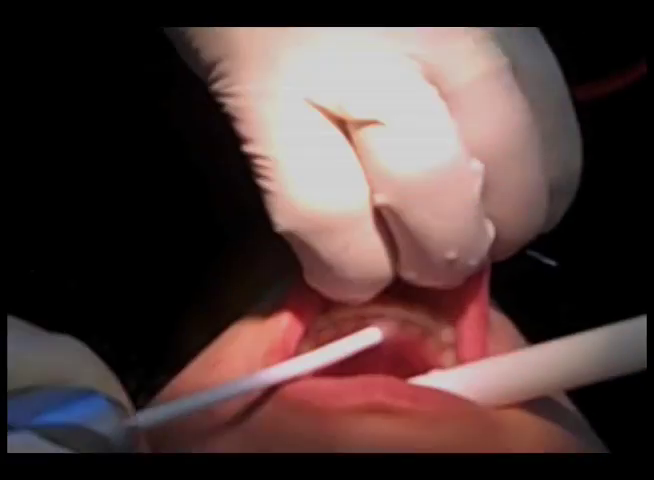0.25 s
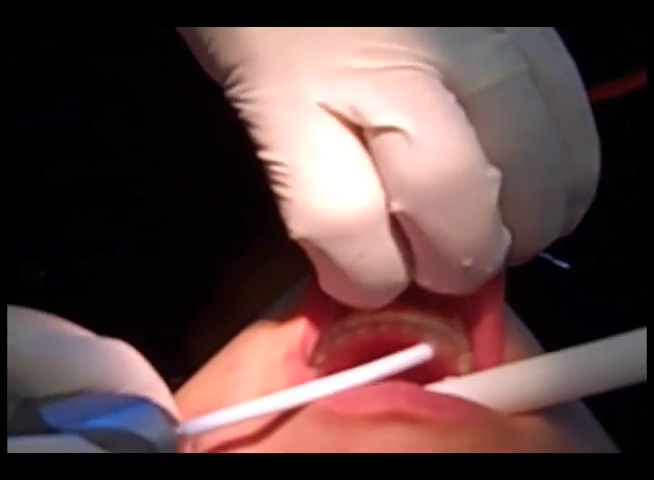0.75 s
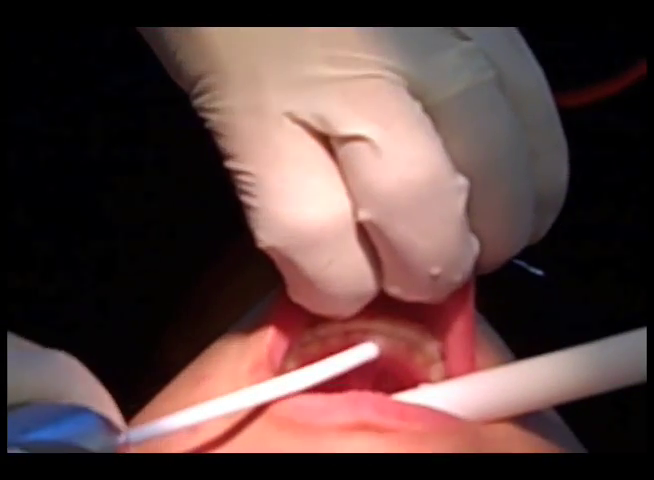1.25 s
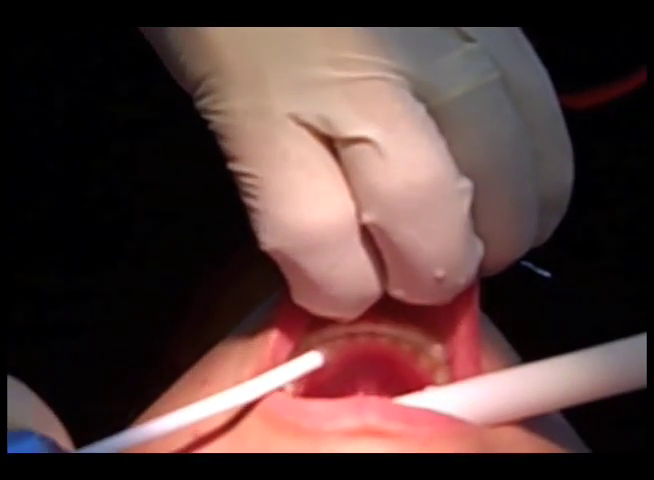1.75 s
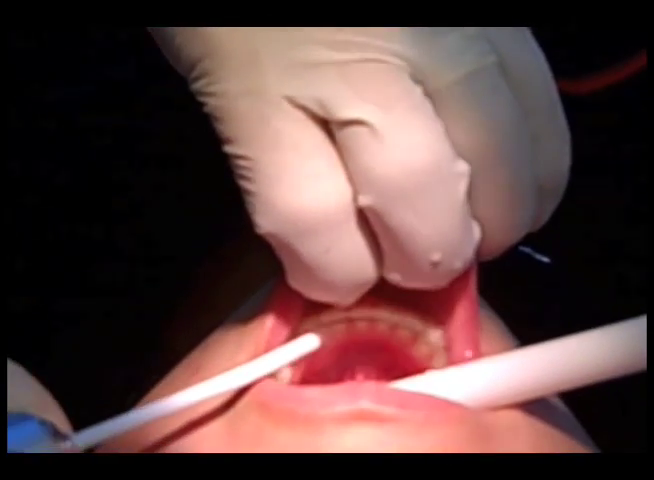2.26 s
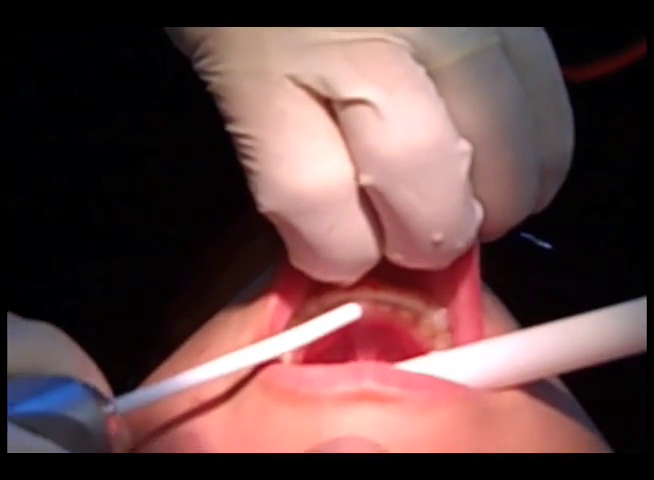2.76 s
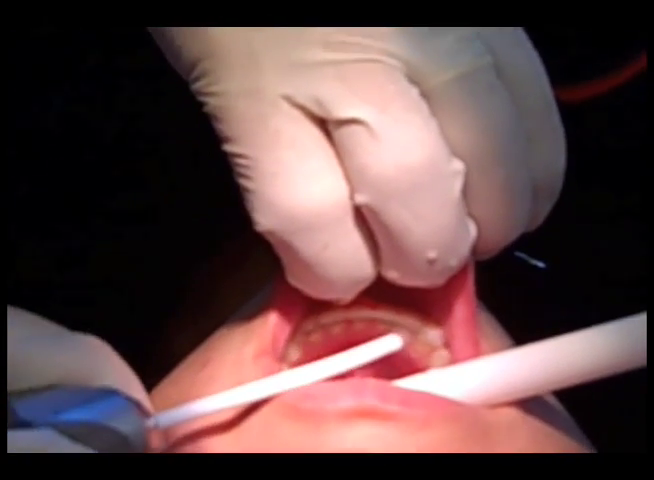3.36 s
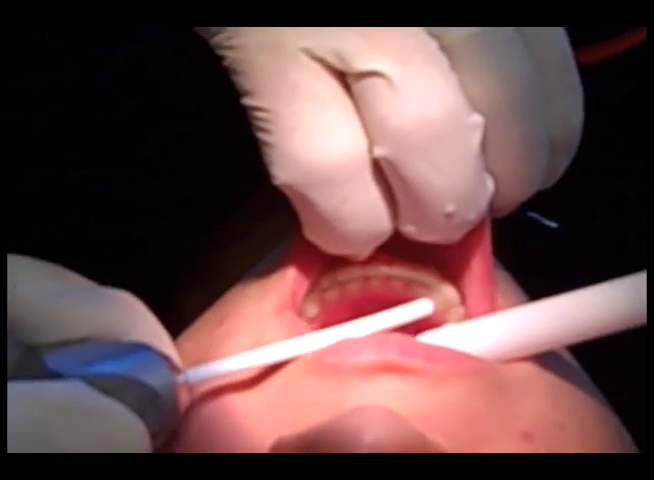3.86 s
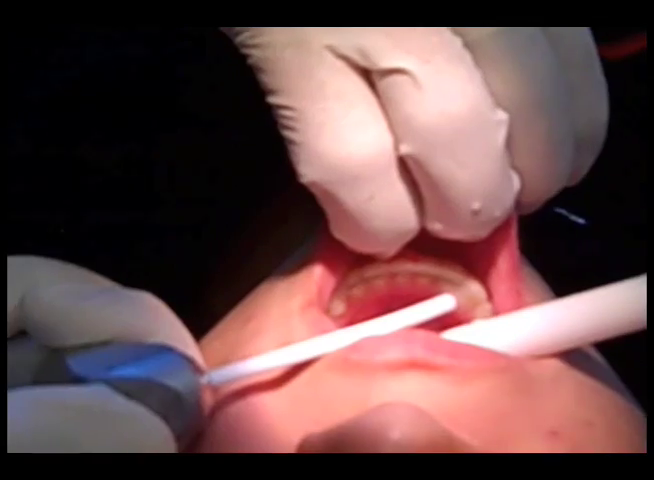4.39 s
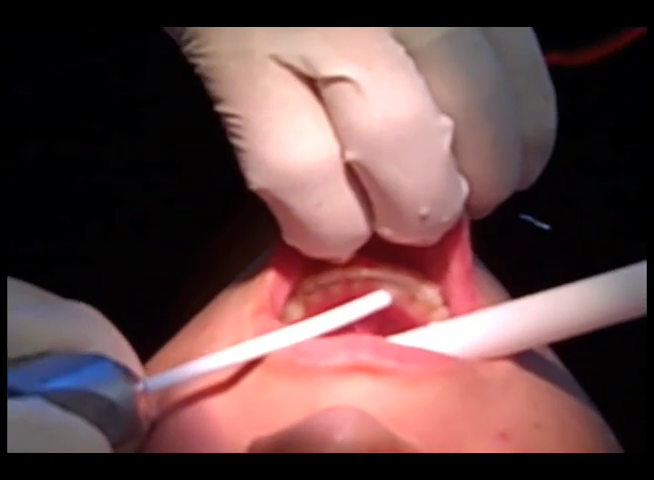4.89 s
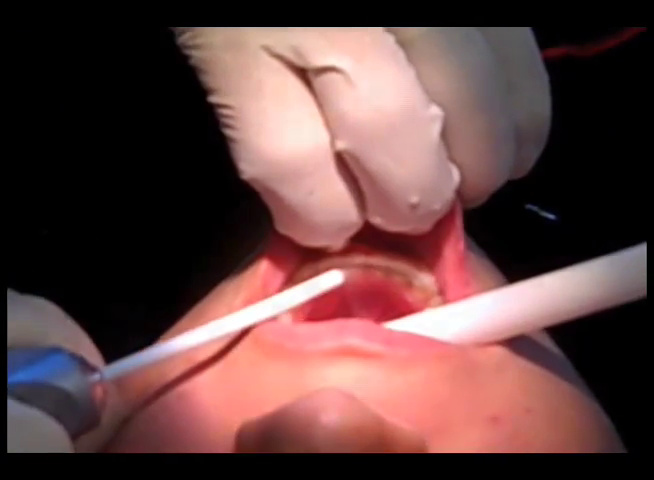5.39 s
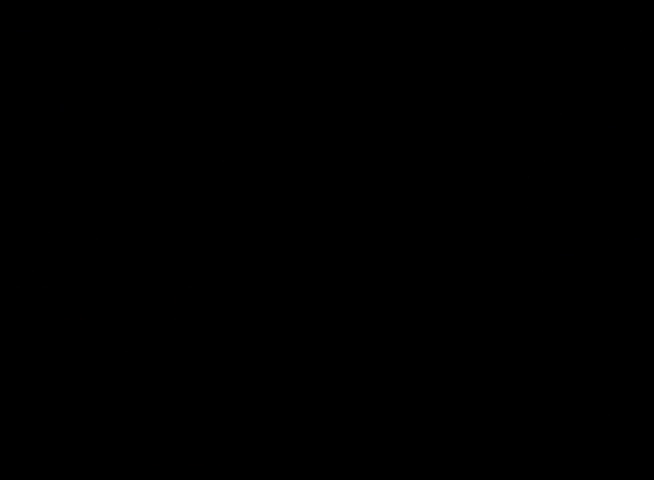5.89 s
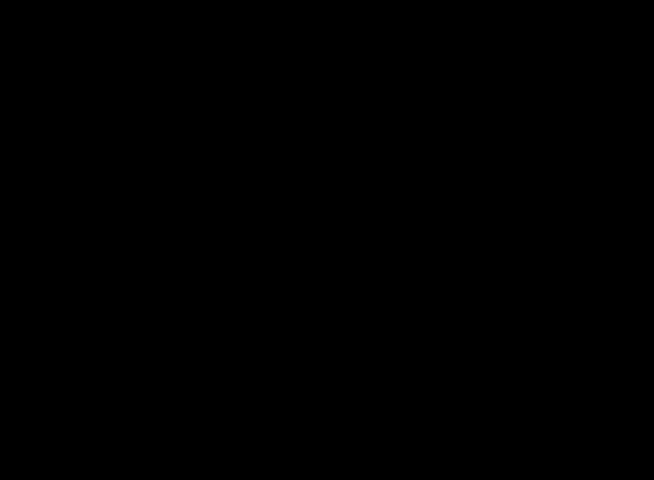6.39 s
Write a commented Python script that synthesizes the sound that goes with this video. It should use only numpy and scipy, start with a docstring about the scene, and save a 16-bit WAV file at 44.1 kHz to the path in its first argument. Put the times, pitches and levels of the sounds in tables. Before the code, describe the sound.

A steady, bright, wet hiss starts at once in a small clinic, close-miked in stereo, its highest fizz leaning left. Brief airy whistles flicker as the jet crosses gaps between teeth, and the mouth cavity adds an unsteady breathy note. Beneath are a weak suction rush, electrical hum and a faint climbing motor. Near the end the spray fades smoothly to almost nothing, with dim room noise behind.

```python
"""A dental air-water syringe hisses and sings, close up, as its jet sweeps along the teeth of an open mouth.
One turbulent stream with droplet ticks is filtered into splash, cavity ring, jet hiss and mist.
Below it lie the suction's low rush (shaped noise), a faint hum and a slowly rising motor note (sines).
Puffs of air rumble at the microphone; all this fades out, and quiet room tone fades in."""
import sys
import numpy as np
from scipy import signal
from scipy.fft import rfft, irfft
from scipy.io import wavfile
from scipy.ndimage import uniform_filter1d

SR = 44100
rng = np.random.default_rng(int(sys.argv[2]) if len(sys.argv) > 2 else 0)


def waveform_to_disk(signal):
    """Save audio, clipped to [-1, 1], as 16-bit WAV at the path in sys.argv[1]."""
    frames = np.transpose(np.atleast_2d(signal))
    scaled = np.clip(frames, -1, 1) * 32767
    samples = np.round(scaled).astype(np.int16)
    wavfile.write(sys.argv[1], SR, samples)


N = 292718
T = np.arange(N) / SR
FRAME = 1024
HOP_OVERLAP = FRAME * 3 // 4
HZ = np.fft.rfftfreq(FRAME, 1 / SR)[:, None]

# Where the nozzle points. Each row: time in seconds, aim (0 = front teeth, 1 = into the cheek).
AIM = [(0, 0), (1.4, 0.29), (1.8, .4), (3.1, 0.93), (3.3, 0.99), (4.7, 1), (5.4, 1), (6.4, 0.78)]
# How hard the water splashes in the mouth. Each row: time in seconds, level in dB before the spray's trim.
SPLASH_LEVEL = [(0.0, -30.2), (0.36, -26.4), (1.13, -24.6), (1.21, -26.8), (1.63, -25.5), (1.75, -23.2),
                (2.15, -26.3), (2.2, -24.7), (2.67, -24.4), (3.14, -27.2), (3.25, -22.4), (3.6, -25.2),
                (3.87, -22.0), (4.18, -23.9), (4.55, -23.6), (5.9, -25.2), (6.07, -28.3), (6.21, -24.4)]
USUAL_SPLASH_DB = -24.5
# Room resonances in the low noise. Each row: frequency in Hz, width in Hz, lift in dB.
ROOM_MODES = [(230, 27, 5), (391, 21, 11.5), (478, 33, 3), (569, 26, 15)]


def gain_of(db):
    """Decibels to amplitude."""
    return 10 ** (np.asarray(db) / 20)


def evened(x):
    """Scales to rms 1."""
    return x / np.sqrt(np.mean(x ** 2) + 1e-20)


def along(rows, t):
    """Columns of a time curve, interpolated at the times t."""
    s, *columns = np.transpose(rows)
    return [np.interp(t, s, c) for c in columns]


def across(rows, hz):
    """Columns of a spectrum, interpolated over log frequency."""
    f, *columns = np.transpose(rows)
    log_f = np.log(np.sort(f) + 1)
    return [np.interp(np.log(hz + 1), log_f, c) for c in columns]


def bell(x, centre, width):
    """Smooth hump over frequency or time: 1 at its centre, a half at width / 2 away."""
    return np.exp2(-(2 * (x - centre) / width) ** 2)


def swells(rows, t):
    """Sum of smooth level humps in dB, one per row of middle s, length s, dB."""
    return sum(db * bell(t, s, length) for s, length, db in rows)


def coloured(spectrum, modes=()):
    """Steady noise of rms 1 with the given spectrum, lifted at the given resonances."""
    hz = np.fft.rfftfreq(N, 1 / SR)
    lift_db = sum(lift * bell(hz, centre, width) for centre, width, lift in modes)
    db = across(spectrum, hz)[0] + lift_db
    return evened(irfft(rfft(rng.standard_normal(N)) * gain_of(db), N))


def wobble(rate_hz):
    """Random motion of rms 1, up to about the given rate."""
    hz = np.fft.rfftfreq(N, 1 / SR)
    lowpass = 1 / (1 + (hz / rate_hz) ** 4)
    return evened(irfft(rfft(rng.standard_normal(N)) * lowpass, N))


def in_band(power, band_hz):
    """Scales each frame's power so that white noise through it has rms 1 within the band."""
    inside = (HZ >= band_hz[0]) & (HZ <= band_hz[1])
    return power / np.mean(power * inside, axis=0)


def turbulence(sputter_db, sputter_hz, drops_per_s, drop_spread_db, drop_db):
    """Rushing air sputters as water breaks up in it, with droplet ticks: two unrelated streams."""
    air = rng.standard_normal((2, N))
    sizes = gain_of(drop_spread_db * np.minimum(rng.exponential(1, N), 4))
    struck = rng.random(N) < drops_per_s / SR
    drops = evened(sizes * struck * rng.choice([-1, 1], (2, N)))
    sputter = gain_of(sputter_db * wobble(sputter_hz))
    return evened((air + gain_of(drop_db) * drops) * sputter)


def spray_levels(t, graze_db, aim, unrest_db=.25, unrest_hz=7):
    """Levels in dB of splash, ring, jet and mist: all follow the splash, and a graze turns ring into hiss."""
    # Air blows straight into the cavity (+) or past it (-).
    # Each row: middle in seconds, length in seconds, ring change in dB.
    ring_swells = [(.6, .18, 2.3), (1.3, .16, 2.2), (1.83, .3, 4), (2.45, .45, 1.2), (3.15, .16, -2),
                   (3.58, .12, -2), (4.85, .7, 1.8)]
    # Water atomises on a tooth. Each row: middle in seconds, length in seconds, mist lift in dB.
    mist_bursts = [(.42, .55, 2.2), (1.14, .35, 2.3), (2.08, .18, 4), (2.25, .08, 3.2), (2.7, .25, 1),
                   (4.32, .15, 1.3), (4.72, .2, 1)]
    # base levels, then dB per dB of splash
    ring_base_db, jet_base_db, mist_base_db = -30.3, -20.2, -27.4
    ring_follows, jet_follows, mist_follows = 1.05, .2, .42
    ring_cheek_db = -1.2  # the cavity rings less with the jet in the cheek
    ring_loss = .27  # air caught by a tooth misses the cavity: dB lost per dB of graze

    splash_db, = along(SPLASH_LEVEL, t)
    push_db = splash_db - USUAL_SPLASH_DB
    ring_db = ring_base_db + ring_follows * push_db + swells(ring_swells, t)
    ring_db = ring_db + ring_cheek_db * aim - ring_loss * graze_db
    jet_db = jet_base_db + jet_follows * push_db + graze_db
    mist_db = mist_base_db + mist_follows * push_db + swells(mist_bursts, t)
    unrest = unrest_db * np.interp(t, T, wobble(unrest_hz))
    return np.array([splash_db, ring_db, jet_db, mist_db]) + unrest


def mouth_power(t, patchy_db):
    """The jet excites the mouth's resonances by where it points; shifting water makes them waver."""
    # Higher mouth resonances. Each row: frequency in Hz, width in Hz,
    # lift in dB with the jet at the teeth, lift in dB with it in the cheek.
    resonances = [(2776, 220, 1.5, 5.3), (3780, 260, 5.3, 2), (4040, 330, 1.8, 3.8), (4900, 840, 1.3, 5.4),
                  (5630, 460, 6, 1), (6280, 350, 2.5, 6), (6740, 440, 3, 4), (9230, 760, 3.5, 0),
                  (12200, 1500, -2, .4)]
    aim, = along(AIM, t)
    lift_db = sum(bell(HZ, hz, width) * (teeth + aim * (cheek - teeth))
                  for hz, width, teeth, cheek in resonances)
    patches = rng.standard_normal(lift_db.shape)
    patches = uniform_filter1d(patches, size=14, axis=0)  # over frequency
    patches = evened(uniform_filter1d(patches, size=7, axis=1))  # over time
    return gain_of(lift_db + patchy_db * patches) ** 2


def cavity_ring(t, width_hz=130, skirt=1.46, waver_hz=10):
    """Power of the mouth's lowest resonance, a breathy whistle of unsteady pitch."""
    # Lowest resonance of the open mouth. Each row: time in seconds, frequency in Hz.
    cavity = [(0.0, 1158), (2.01, 1190), (2.26, 1190), (3.92, 1180), (4.76, 1255), (5.04, 1223),
              (6.4, 1276)]
    ring_hz = along(cavity, t)[0] + waver_hz * np.interp(t, T, wobble(25))
    return (1 + (2 * (HZ - ring_hz) / width_hz) ** 2) ** -skirt


def edge_tone(t, graze_db, aim, width_hz=440, waver_hz=80):
    """Power lift of an unsteady edge tone in the jet, which sinks as the jet bears on a tooth."""
    free_hz, sag_hz_per_db = 7660, 90
    teeth_db, cheek_db = 5.3, 3.6  # height over the hiss, by aim
    edge_hz = free_hz - sag_hz_per_db * graze_db + waver_hz * np.interp(t, T, wobble(40))
    edge_db = teeth_db + aim * (cheek_db - teeth_db)
    return gain_of(edge_db * bell(HZ, edge_hz, width_hz)) ** 2


def whistle_lift_db(t):
    """Brief breathy whistles as the jet crosses gaps between teeth, and one broad low spatter of the splash
    near 1 s: lifts of the spray's noise."""
    # Each row: middle in seconds, length in seconds, frequency in Hz, width in Hz, lift in dB.
    whistles = [(.45, .35, 9300, 600, 3.5), (.48, .25, 2830, 200, 4), (1.1, .25, 9500, 600, 3.5),
                (1.05, .3, 1900, 900, 2.5), (1.38, .22, 6100, 450, 3), (2.12, .14, 10400, 600, 4),
                (2.174, 0.07, 6440, 500, 4), (2.52, .22, 7620, 400, 3), (5.1, .45, 8500, 350, 3.5),
                (5.75, .35, 13500, 800, 5), (6.02, .24, 8880, 700, 9), (6.02, .2, 6450, 450, 3.5)]
    return sum(db * bell(t, s, length) * bell(HZ, hz, width)
               for s, length, hz, width, db in whistles)


def at_ports(z):
    """Two unrelated streams become a port pair: alike in the bass, shaded and turned in the treble."""
    # The two microphone ports. Each row: frequency in Hz, left minus right in dB,
    # likeness (0-1), lead of the left in radians.
    ports = [(850, 0, 1, 0), (1250, -0.2, 0.98, -.1), (1550, 0, 1, 0), (2850, 0, 1, 0),
             (3200, 0, 0.8, -.15), (3600, 0, .95, -.1), (4000, -1, 0.82, -0.42), (5000, -.5, .8, -.36),
             (5570, -.3, 0.68, -0.6), (6000, -2.5, .72, -1.1), (6280, -6.5, .82, -0.95),
             (6720, -3.5, 0.95, -0.76), (7450, 3, 0.88, 0.4), (8100, 10, .85, 0.2), (8700, 11, 0.6, -.2),
             (9500, 11, .74, -1.5), (11500, 8.5, .52, -1.8), (14100, 19.5, .33, -2)]
    tilt_db, same, lead_rad = across(ports, HZ)
    same, tilt = np.clip(same, 0, 1), gain_of(tilt_db / 2)
    left = tilt * z[0]
    right = (same * z[0] + np.sqrt(1 - same ** 2) * z[1]) * np.exp(-1j * lead_rad) / tilt
    # dividing by this keeps the level of the left-right mean
    centre = np.sqrt(tilt ** 2 + tilt ** -2 + 2 * same * np.cos(lead_rad)) / 2
    return np.array([left, right]) / centre


def spray(ring_flutter_db=0.9, trim_db=-.35):
    """One turbulent stream sounds as splash, cavity ring, jet hiss and mist."""
    # Colour of each part. Each row: frequency in Hz, relative density in dB per Hz.
    splash_colour, jet_colour, mist_colour = [(300, -37), (520, -33), (630, -23), (770, -8.3), (950, -8),
                                              (1100, -4), (1450, 1.2), (1750, -1), (2000, 0.2),
                                              (2300, -0.5), (3450, -1.1), (3900, 2), (5800, -2),
                                              (7000, -15), (10000, -31)], [(4500, -42.5), (5700, -14.5), (6100, -4),
                                                              (6600, -1.5), (7200, 1.5), (7800, -0.5),
                                                              (8300, -8.5), (9200, -27.5), (12000, -37.5)], [(6500, -39), (8000, 3.5),
                                                                           (8500, 0), (8850, 1.5),
                                                                           (9500, 0), (10100, -3.5),
                                                                           (10800, -6), (11800, -10.5),
                                                                           (12700, -11), (14200, -11.5)]
    # The jet bears on a tooth (+) or slips off it (-).
    # Each row: middle in seconds, length in seconds, hiss change in dB.
    grazes = [(1.39, .28, 3.4), (2.17, .07, 3.6), (2.33, .25, -1.2), (2.75, .4, 4.4), (3.33, .22, 1.7),
              (3.63, .12, -1.5), (4.2, .25, -.7), (4.85, .45, 1.5), (5.38, .25, 1.2), (5.78, .5, -3.5),
              (6.17, .16, -2.2)]

    stream = turbulence(sputter_db=0.35, sputter_hz=160, drops_per_s=1100, drop_spread_db=3, drop_db=-9)
    _, t, z = signal.stft(stream, SR, nperseg=FRAME, noverlap=HOP_OVERLAP)
    graze_db, aim = swells(grazes, t), along(AIM, t)[0]
    splash_db, ring_db, jet_db, mist_db = spray_levels(t, graze_db, aim)
    ring_db = ring_db + ring_flutter_db * np.interp(t, T, wobble(35))

    mouth = mouth_power(t, patchy_db=1.1)
    splash, jet, mist = (mouth * gain_of(across(colour, HZ)[0]) ** 2
                         for colour in (splash_colour, jet_colour, mist_colour))
    jet = jet * edge_tone(t, graze_db, aim)
    # each level holds within the band given in Hz
    power = in_band(splash, (1600, 5500)) * gain_of(splash_db) ** 2
    power = power + in_band(cavity_ring(t), (1000, 1450)) * gain_of(ring_db) ** 2
    power = power + in_band(jet, (6000, 8200)) * gain_of(jet_db) ** 2
    power = power + in_band(mist, (8600, 14000)) * gain_of(mist_db) ** 2

    z = at_ports(z) * np.sqrt(power) * gain_of(whistle_lift_db(t) + trim_db)
    return signal.istft(z, SR, nperseg=FRAME, noverlap=HOP_OVERLAP)[1][:, :N]


def reflected(x, wet_db=-16, first_s=.003, spread_s=.03, count=40):
    """Lamp, tray and chair throw back many weak early reflections, which ripple the hiss irregularly."""
    late, sign = rng.random(count), rng.choice([-1, 1], count)
    delays = np.round((first_s + spread_s * late) * SR).astype(int)
    taps = np.bincount(delays, sign * np.exp(-late))
    echoes = signal.oaconvolve(x, taps[None] / np.linalg.norm(taps))[:, :N]
    return x + gain_of(wet_db) * echoes


def clinic(rush_db=-52.5, side_db=-20, rush_follows=.5):
    """Low rush of the suction, which grows with the splash, with faint hum and a rising motor note."""
    # Low rush of suction and clinic. Each row: frequency in Hz, relative density in dB per Hz.
    rush_colour = [(20, 1), (33, 3.5), (52, -3.5), (100, -3), (185, 3.5), (270, 1.5), (320, -2),
                   (430, -11.5), (620, -11.5), (1000, -31.5), (2000, -67)]
    # A motor gathers speed. Each row: time in seconds, frequency in Hz, rms level in dB.
    motor_course = [(0, 70, -80), (1.4, 75.7, -66), (3, 82.1, -65.5), (3.8, 88.3, -57.5), (5, 95.2, -61),
                    (6.4, 102.6, -61.5)]
    # Electrical hum of the equipment. Each row: frequency in Hz, rms level in dB.
    hum_tones = [(60, -73), (120, -67.5)]
    motor_hz, motor_db = along(motor_course, T)
    motor = gain_of(motor_db) * np.sin(2 * np.pi * np.cumsum(motor_hz) / SR)
    hum = sum(gain_of(db) * np.sin(2 * np.pi * hz * T) for hz, db in hum_tones)
    side = coloured(rush_colour) * np.array([[1], [-1]])
    rush = coloured(rush_colour, ROOM_MODES) + gain_of(side_db) * side
    push_db = along(SPLASH_LEVEL, T)[0] - USUAL_SPLASH_DB
    tones = np.sqrt(2) * (motor + hum)  # peak to rms
    return gain_of(rush_db + rush_follows * push_db) * rush + tones


def puffs(right_db=3):
    """Stray air buffets the microphone with a soft rumble, more at the right port."""
    # Each row: start in seconds, length in seconds, level in dB before the port shading, upper edge in Hz.
    gusts = [(2.15, .35, -55, 70), (3.285, .075, -38, 40), (3.37, 0.095, -40, 120), (3.44, .1, -44.5, 190),
             (3.53, .07, -47, 70)]
    out = np.zeros(N)
    for s, length, db, edge_hz in gusts:
        swell = np.sin(np.pi * np.clip((T - s) / length, 0, 1))
        out += gain_of(db) * swell * wobble(edge_hz)
    return out * gain_of([[-right_db / 2], [right_db / 2]])


def fade(from_s=5.63, to_s=6.475, shape=1.05):
    """The gain falls almost evenly to silence."""
    return np.clip((to_s - T) / (to_s - from_s), 0, 1) ** shape


def room_tone(side_db=-9):
    """The quiet room, as shaped noise, fades in as the spray ends."""
    # Each row: frequency in Hz, relative density in dB per Hz.
    room_colour = [(35, -49.5), (60, -16), (203, -7), (277, -13.5), (917, -28.5), (1140, -20),
                   (1670, -30.5), (6310, -32), (12000, -53.5), (15600, -81.5), (22000, -120)]
    # Each row: time in seconds, level in dB of the part common to both ports.
    room_level = [(6.46, -100), (6.49, -78), (6.54, -64.5), (6.6, -58.5), (6.64, -58.5)]
    side = coloured(room_colour) * np.array([[1], [-1]])
    tone = coloured(room_colour, ROOM_MODES) + gain_of(side_db) * side
    return tone * gain_of(along(room_level, T)[0])


def scene():
    """The spray close up, over the background of the clinic; both fade out and leave the quiet room."""
    return (reflected(spray()) + clinic() + puffs()) * fade() + room_tone()


def record(dry, ceiling=0.96, cutoff_hz=14300):
    """Soft saturation rounds off the highest peaks; a steep low-pass then limits the band."""
    rounded = dry / (1 + (dry / ceiling) ** 8) ** (1 / 8)
    lowpass = signal.firwin(801, cutoff_hz, window=("kaiser", 8), fs=SR)
    return signal.oaconvolve(rounded, lowpass[None], "same")


dry = scene()
out = record(dry)
waveform_to_disk(out)
```